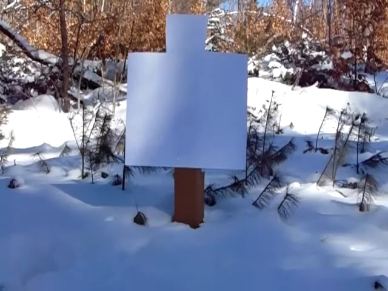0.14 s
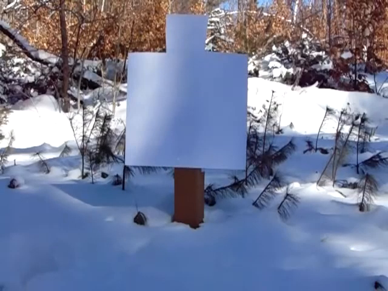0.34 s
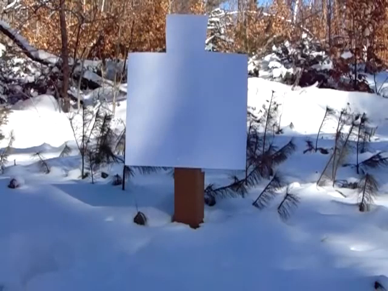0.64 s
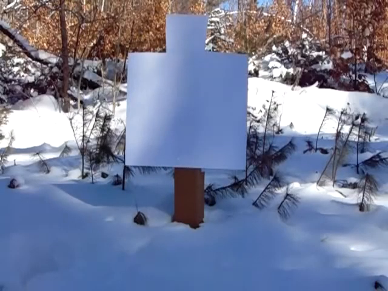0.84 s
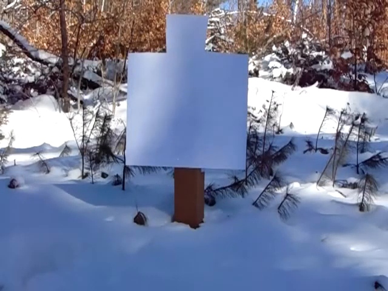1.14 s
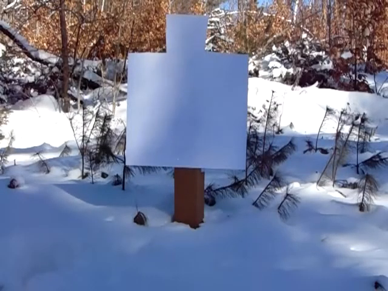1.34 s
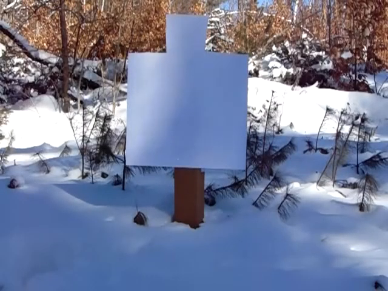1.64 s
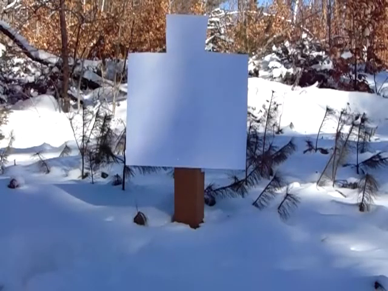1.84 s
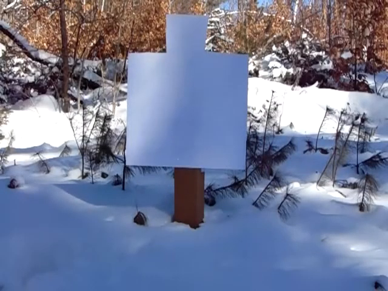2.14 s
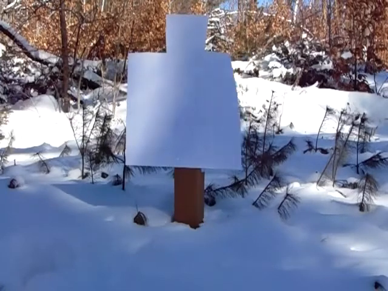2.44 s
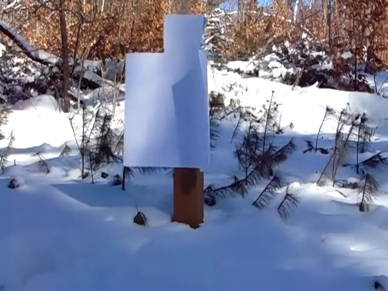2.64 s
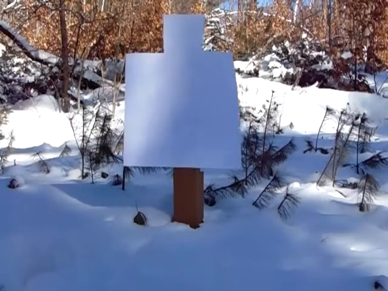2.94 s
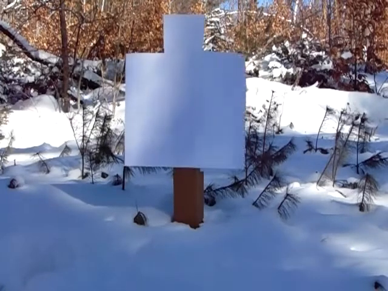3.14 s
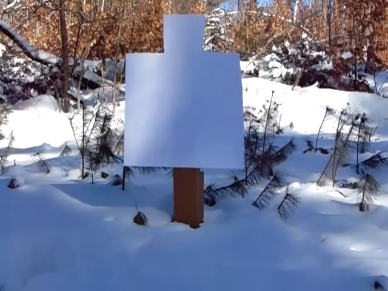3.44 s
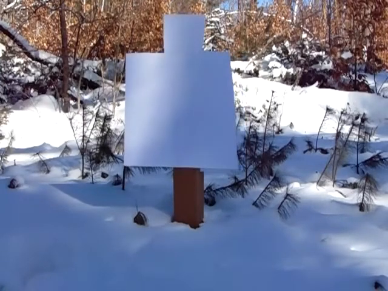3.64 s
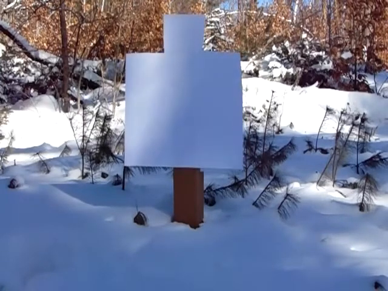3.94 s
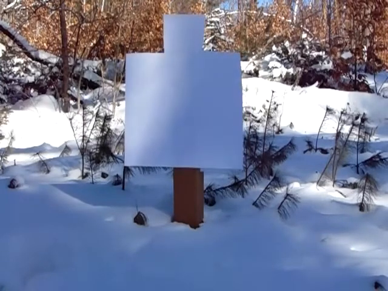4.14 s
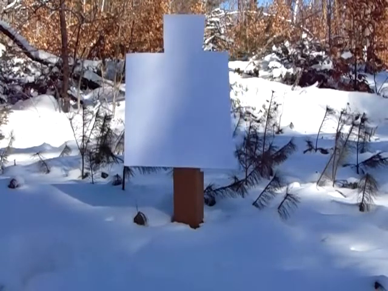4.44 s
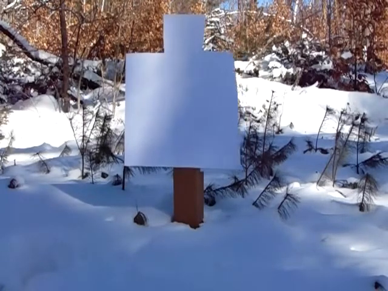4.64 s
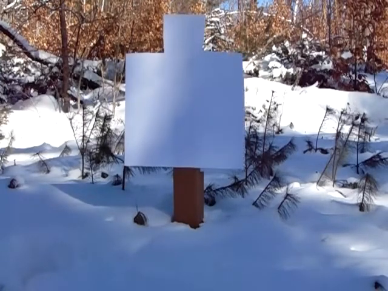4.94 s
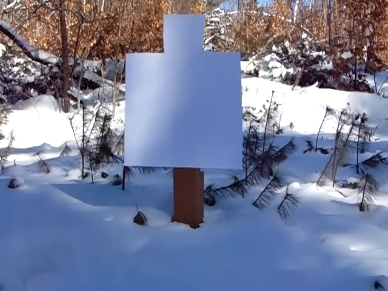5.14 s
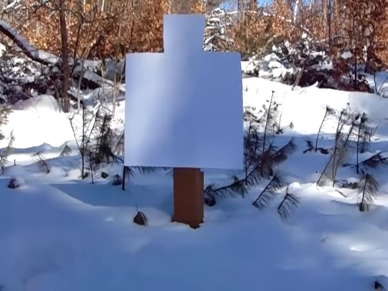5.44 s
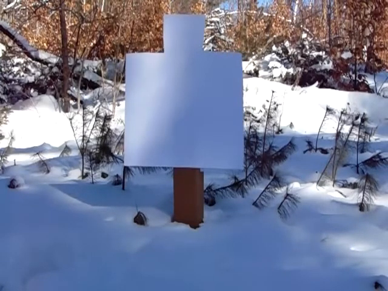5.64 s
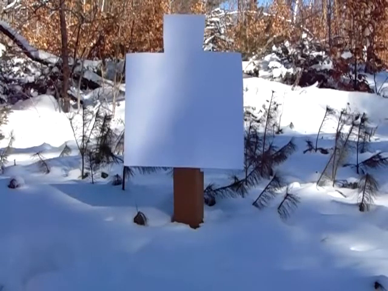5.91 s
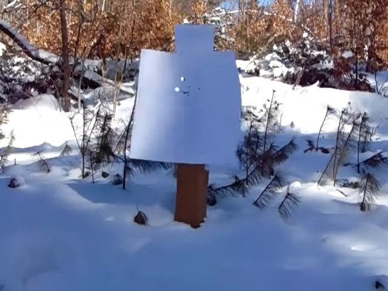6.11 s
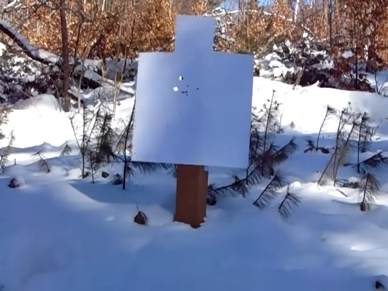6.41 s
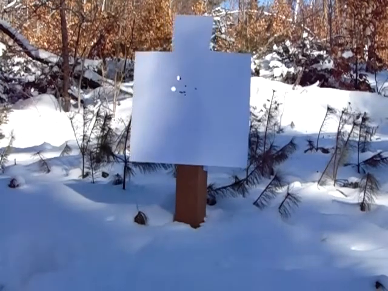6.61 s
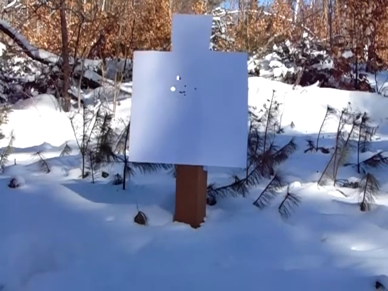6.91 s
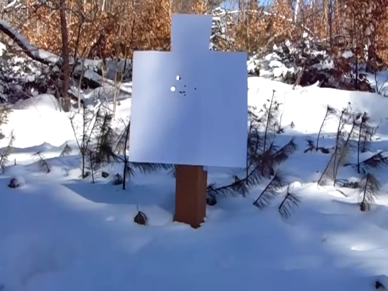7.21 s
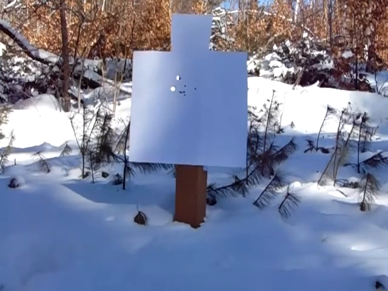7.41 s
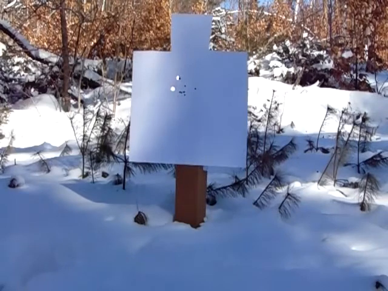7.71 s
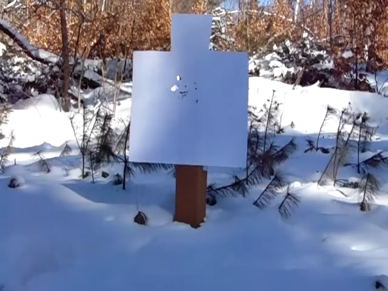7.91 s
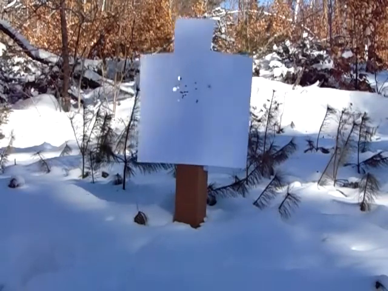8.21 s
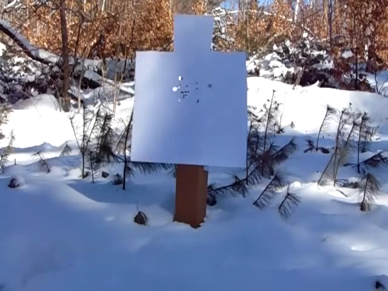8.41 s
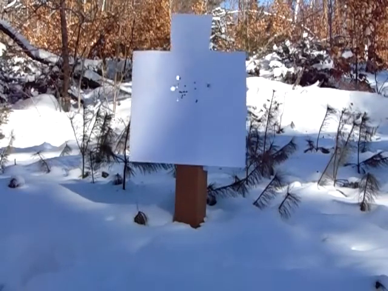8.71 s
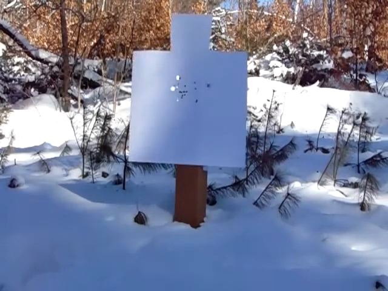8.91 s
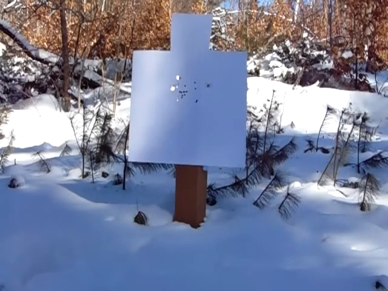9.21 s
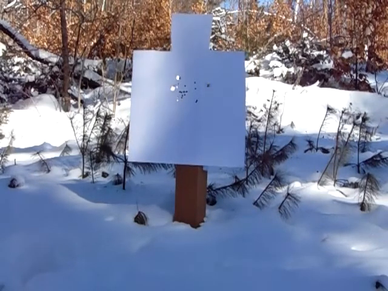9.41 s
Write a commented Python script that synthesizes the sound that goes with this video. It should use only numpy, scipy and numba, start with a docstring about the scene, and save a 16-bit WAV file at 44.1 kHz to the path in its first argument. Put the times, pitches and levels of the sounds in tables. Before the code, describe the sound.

Quiet outdoor air with soft hiss and wind buffeting on a close single-channel microphone. A shotgun slide is racked with crisp metallic clicks, followed by muffled handling, a footstep in snow and two isolated clacks. After a lull, a clipped, violent shot cracks through the trees, then racking, then a second shot, its echo dying under more clatter and faint hiss.

```python
"""A pump shotgun is handled and racked in a snowy clearing, over woods' murmur, hiss and wind buffeting.
Soft knocks and a step in the snow follow, then a few strikes of gun parts before two shots, each followed
by more clatter. Steel strikes are band-split noise rattles; knocks are noisy rings; scrapes are grainy noise.
Each blast is turbulent noise and a suction that pins the microphone amplifier at its lower rail;
near trees scatter a bright noise roar and sharp slaps, then the far tree line returns a dull swell."""
import sys
import numpy as np
from scipy import signal
from scipy.fft import rfft, irfft
from scipy.io import wavfile
from scipy.ndimage import uniform_filter1d
from numba import njit

SR = 44100
rng = np.random.default_rng(int(sys.argv[2]) if len(sys.argv) > 2 else 0)


def store_wav(level_fs):
    """Save 16-bit WAV to argv[1]."""
    pcm = np.round(np.clip(np.atleast_2d(level_fs), -1, 1) * 32767)
    wavfile.write(sys.argv[1], SR, pcm.T.astype(np.int16))


N = 421596

# All source levels are set ahead of the microphone amplifier.
# Beds of woods' murmur and hiss. Each row: time in seconds, murmur level in dB before its flutter, hiss level in dB.
BED_LEVELS = [(0, -47.5, -50), (.152, -54.5, -49.5), (.157, -58.5, -60), (1.3, -57.5, -56.5),
              (2.33, -56.5, -56.5), (3.4, -56.5, -55), (5, -58.5, -54), (6.1, -57.5, -54),
              (6.9, -66.5, -59), (8.0, -62, -58.5), (8.9, -68, -57), (9.25, -65.5, -68.5),
              (9.56, -65, -63.5)]
# Spectrum of the murmur. Each row: frequency in Hz, relative level in dB per Hz.
MURMUR_COLOUR = [(47, -32), (80, 1), (269, -1.5), (313, -2), (669, -5.5), (721, -5.5), (1100, -9),
                 (3000, -15.5), (3900, -32.5), (6600, -120)]
# Spectrum of the hiss. Each row: frequency in Hz, relative level in dB per Hz.
HISS_COLOUR = [(700, -24), (1200, -9), (2000, -8), (3500, 1.5), (6000, -0.5), (9000, -1), (12000, -0.5),
               (14000, -0.5), (16000, 2.5)]
# Spectrum of wind on the microphone. Each row: frequency in Hz, relative level in dB per Hz.
WIND_SPECTRUM = [(10, -31), (20, 6), (30, 6), (50, -1.5), (90, -15), (150, -35), (300, -54)]
# Wind gusts. Each row: peak time in seconds, level in dB before the wind boost,
# length in seconds (twice the fade time constant).
WIND_GUSTS = [(0, -60, .04), (2.15, -45, .08), (2.54, -57, .08), (2.71, -58, 0.046), (2.84, -54, .12),
              (3.41, -58, .1), (3.6, -62, 0.074), (4.41, -66, .1), (4.57, -52, .1), (4.71, -50, .1),
              (4.84, -55, .12), (5.05, -55, 0.086), (5.56, -44, 0.062), (5.74, -56, .1), (5.95, -43.5, .07),
              (6.13, -48.5, .1), (6.31, -40, .04), (6.63, -43.5, .1), (6.766, -44, 0.064),
              (6.9, -42, 0.059), (7.626, -45.5, 0.12), (7.836, -52, 0.056), (7.97, -53.5, .14),
              (8.2, -58, .1), (8.544, -54, 0.049)]
# Soft hollow handling knocks and a step in the snow. Each row: start in seconds, peak in dB, pitch in Hz.
SOFT_KNOCKS = [(0.067, -37, 830), (0.102, -37, 810), (0.135, -37.5, 790), (0.145, -43, 1080),
               (2.059, -49, 336), (2.089, -43, 371), (2.138, -43, 480), (2.152, -46, 760),
               (2.185, -41, 280), (2.207, -43, 600), (2.229, -40.5, 534), (2.247, -44, 830),
               (2.259, -44.5, 300), (2.288, -46.5, 260)]
# The slide scraping and cloth rustling. Each row: start in seconds, length in seconds, level in dB.
SCRAPES = [(.905, 0.098, -50), (.99, 0.086, -50), (1.127, 0.053, -48), (1.938, .105, -53),
           (2.065, .11, -57), (6.74, 0.18, -58), (8.56, 0.06, -49), (8.702, 0.14, -49.5)]
# Spectrum of the scrapes. Each row: frequency in Hz, relative level in dB per Hz.
SCRAPE_COLOUR = [(500, -0.5), (2000, -6.5), (5000, -2), (14000, -4)]
# Gun parts striking. Each row: start in seconds, body peak in dB, thud in dB against the body,
# clack centre in Hz, clack half width in octaves, clack in dB and treble in dB against the body.
STRIKES = [(0.1687, -40, -16, 3000, .4, -5, -2), (0.3476, -44, -21, 3300, .4, 3, 16),
           (0.624, -24, -11, 2180, 0.31, -7, 4), (0.7143, -47, -11, 2000, .6, -10, 4),
           (0.8445, -40.5, -17, 2000, .6, -18, -13), (0.9035, -35.5, -23, 2000, 0.78, -5.5, 2),
           (0.9734, -34, -21, 2000, .7, -6, 2), (0.9841, -23, -15, 2300, 1.2, 5, 15),
           (1.1009, -41, -13, 3350, 0.13, 1.5, 9), (1.145, -32, -1, 3000, 0.51, 1.5, 9),
           (1.1504, -30, -3.5, 2500, .6, -6, 3), (1.1565, -42, -1, 2500, .6, -8, 0),
           (1.205, -40.5, -10, 1900, .5, -3, -6), (1.955, -42.5, -4, 3000, .4, -2, -5),
           (2.0434, -45.5, -10, 2000, .6, -11, 11), (2.1604, -46, 2, 3000, .5, -3, 10),
           (2.5078, -47.5, -9, 2500, 0.66, 5.5, -10), (3.0120, -19, -21.5, 1820, 1.07, 2, 5.5),
           (3.0544, -52, -7, 3000, 0.45, 6, -6), (3.269, -51.5, -15, 2100, 0.44, 12, -9),
           (4.4496, -30, -33, 1820, 0.15, -1.5, 2), (6.6029, -38, -15, 2980, .5, -8, -5),
           (6.6267, -20, -23, 2996, 0.31, -9.5, 4.5), (6.652, -29.5, -14, 2000, .6, -19, 4),
           (6.7565, -47, 1, 1800, .6, -10, 12), (6.786, -41, 4, 3360, .2, 6, 10),
           (6.824, -43, 0, 2000, .6, -2, 10), (6.8755, -36, -4, 1800, 0.27, -2, 9),
           (8.487, -32.5, 6.5, 3000, .4, -7, 7), (8.559, -22, -15, 3020, .4, -8, 6.5),
           (8.5809, -36, -12, 3000, .4, -1, 13), (8.6867, -45, -9, 2500, .6, -2, 7),
           (8.7157, -35.5, -8, 2520, .5, -1, 10), (8.74, -48, 5, 3000, .4, -7, 5),
           (8.754, -45, -21, 2500, 0.66, 7, 12), (8.7772, -33.5, -5, 2200, 0.85, 5, 14.5),
           (8.7856, -30, -13, 2800, 0.62, 1, 10.5)]
# Bands of a strike: thud, body and treble. Each row: low edge in Hz, high edge in Hz.
STRIKE_BANDS = [(350, 1000), (3500, 7000), (7000, 16000)]
# Modes of the steel action. Each row: nominal pitch in Hz, nominal level in dB within the ring,
# time to fade by 60 dB in seconds.
STEEL_MODES = [(1850, 4, .035), (3500, 0, .012), (4500, 0, .012), (7800, 0, .015), (9500, 0, .015),
               (11700, 0, .02)]
# Spectrum of the roar's dull part. Each row: frequency in Hz, relative level in dB per Hz.
DULL_COLOUR = [(60, -30), (130, -18), (250, -2.5), (500, -1), (1000, -1.5), (1800, -6.5), (3000, -13.5),
               (6000, -29.5)]
# Spectrum of the roar's bright part. Each row: frequency in Hz, relative level in dB per Hz.
BRIGHT_COLOUR = [(500, -9.5), (1500, -1), (3000, 0.5), (6000, -1), (9000, -4.5), (12000, -3), (16000, -3.5)]
# Spectrum of the far swell before its moving edge. Each row: frequency in Hz, relative level in dB per Hz.
SWELL_COLOUR = [(60, -37), (150, -25.0), (250, 1.5), (500, 4.0), (1000, 3), (3000, -9), (8000, -11.5)]
# Echoes that stand out as single slaps. Each row: start in seconds, peak in dB, ring pitch in Hz.
ECHO_SLAPS = [(6.231, 5, 950), (6.243, 5, 1150), (6.2565, 1, 1000), (6.2765, 2, 1050), (6.294, -6, 880),
              (6.4258, -14, 1230), (6.514, -23, 750), (8.0676, 8, 1900), (8.1025, 0, 1900),
              (8.1135, 1, 1100), (8.1292, 7, 1050), (8.1608, -9, 820), (8.3093, -17, 1500),
              (8.371, -25, 700), (8.399, -25, 780)]
# Blast fronts and first reflections. Each row: start in seconds, length in seconds, turbulence in dB,
# push above rest in amplifier input units.
PRESSURE_FRONTS = [(6.1612, .0090, 19, -2.5), (6.1808, .0105, 25.5, 6), (6.2030, .0030, 13, -2.5),
                   (6.2072, .0015, 20.5, 0.5), (8.0460, .0075, 18.5, 1.5), (8.0674, .0017, 9, 6),
                   (8.0788, .0004, 1, 1.5), (8.0912, .0016, 10.5, 1)]
# Spectrum of the turbulent gas. Each row: frequency in Hz, relative level in dB per Hz.
GAS_COLOUR = [(100, -8), (500, -1), (1200, -4.5), (3000, -10), (8000, -18.0), (16000, -13.0)]
# The shots. Each row: start in seconds, suction depth in amplifier input units before its decay,
# suction decay in seconds, roar hold in seconds, near roar in dB, its fall in dB per second,
# deep-woods tail in dB, far echo's peak delay in seconds, far echo in dB before its flutter.
GUN_SHOTS = [(6.1619, 8.6, 0.058, 0.075, -3.5, -600, -27.5, 1.035, -43.5),
             (8.045, 7.53, 0.099, 0.073, -10.5, -700, -29, 0.85, -49)]

BREEZE_DB, WIND_BOOST_DB = -6, 6.5  # steady rumble against the murmur; boost of all wind
KNOCK_T60_S = .055  # fade of the noise that drives a knock
SCRAPE_FADE_S = .015
GRAINS_PER_S, GRAIN_S, GRAIN_SPREAD_DB = 200, .001, 3.0
RATTLE_S, RING_DB = .00068, -48.5  # rattle time constant, drive of the steel ring
LOOSE_DB, LOOSE_FADE_S = -21, .006
WALL_S, WALL_DB = .0214, -22.5  # a surface a few metres off returns each strike once
TREES_DB, TREES_T60_S = -43.5, .49  # scattered answer, level before its low-pass and fade
ROAR_ARRIVES_S, EARLY_DB = .045, -4  # the nearest trunks answer weaker until the thicket joins in
NEAR_DULL_SHARE = 1  # the near dull roar falls at this share of the bright rate
DULL_TAIL_DB_S, BRIGHT_TAIL_DB_S = -34, -45
MIDDLE_DB, MIDDLE_FALL_DB_S = 9.5, -170  # trees further back, level against the tail
BRIGHT_DB, BRIGHT_TAIL_DB, BRIGHT_TAIL_ENDS_S = 1.5, -2, .82  # treble dies out beyond the last near trees
FAR_RISE_S, FAR_FALL_S = .3, .67  # distance from the peak at which the swell is 5.1 dB down
FAR_EDGE_HZ, FAR_DULLS_OCT_S = 1200, 1  # upper edge at the peak, sinking as air absorbs the treble
SLAP_CYCLES, SLAP_CRACK_S = 12., .0009  # ring cycles to fade by 60 dB, crack time constant
SUCTION_RISE_S = .008
RAIL, LEAK = 3.57, .05  # amplifier limit in input units, share of the excess that still passes
COUPLING_HZ, RUMBLE_CUT_HZ, TOP_HZ = 121, 6, 14350
CONVERTER_LIMIT = .86


def undb(db):
    """Turn dB into an amplitude factor."""
    return 10 ** (np.asarray(db) / 20)


def noise(colour):
    """Shape white noise with a (Hz, dB) spectrum and scale it to rms 1."""
    hz, db = np.transpose(colour)
    bins = np.arange(1, N // 2 + 2) * SR / N
    shape = undb(np.interp(np.log(bins), np.log(hz), db))
    x = irfft(rfft(rng.standard_normal(N)) * shape, N)
    return x / np.std(x)


def gains(table):
    """Draw gain curves through a (seconds, dB, ..) table."""
    s, *columns = np.transpose(table)
    return [undb(np.interp(np.arange(N) / SR, s, c)) for c in columns]


def walk(rate):
    """Wander randomly with spread near 1: levels held 1 / rate seconds, smoothed twice."""
    k = int(SR / rate)
    steps = np.repeat(rng.standard_normal(N // k + 1), k)
    return 1.4 * uniform_filter1d(uniform_filter1d(steps, k), k)[:N]


def add(out, s, x):
    """Mix a sound in at s seconds, cut at the end of the scene."""
    i = int(s * SR)
    out[i:i + len(x)] += x[:N - i]


def ring(x, hz, t60):
    """Let x excite one decaying mode."""
    pole = np.exp(2j * np.pi * hz / SR - np.log(1000) / (max(t60, .002) * SR))
    return signal.lfilter([1], [1, -pole], x).imag


@njit
def lowpass(x, hz):
    """Darken x through two one-pole stages with a moving edge."""
    y, a, b = np.empty(len(x)), 0., 0.
    for i in range(len(x)):
        g = 1 - np.exp(-2 * np.pi * hz[i] / SR)
        a += g * (x[i] - a)
        b += g * (a - b)
        y[i] = b
    return y


def background():
    """Lay fluttering murmur and smooth hiss under low noise that swells with wind gusts on the microphone."""
    murmur, hiss = gains(BED_LEVELS)
    t = np.arange(N) / SR
    gusts = sum(undb(db) * np.exp(-np.abs(t - s) / (length / 2)) for s, db, length in WIND_GUSTS)
    breeze = murmur * undb(BREEZE_DB + 3.0 * walk(8))
    wind = (gusts + breeze) * undb(WIND_BOOST_DB + 2 * walk(33)) * noise(WIND_SPECTRUM)
    return murmur * undb(walk(26)) * noise(MURMUR_COLOUR) + hiss * noise(HISS_COLOUR) + wind


def knocks():
    """Excite one pitch and a weaker overtone with a short burst of noise per knock."""
    out, t = np.zeros(N), np.arange(5000) / SR
    for s, db, hz in SOFT_KNOCKS:
        blow = rng.standard_normal(len(t)) * undb(-60 * t / KNOCK_T60_S)
        x = ring(blow, hz, 0.014) + undb(-7) * ring(blow, 2.05 * hz, 0.012)
        add(out, s, undb(db) * x / np.abs(x).max())
    return out


def scraping():
    """Modulate coloured noise with random stick-slip grains over a steady rub."""
    t = np.arange(N) / SR
    rubbing = np.zeros(N)
    for s, length, db in SCRAPES:
        fade = np.clip(np.minimum(t - s, s + length - t) / SCRAPE_FADE_S + .5, 0, 1) ** 2
        rubbing += undb(db) * fade
    when, size = rng.random((2, N))
    slips = (when < GRAINS_PER_S / SR) * undb(-GRAIN_SPREAD_DB * np.log(1 - size))
    grains = 0.51 + signal.lfilter([1], [1, -np.exp(-1 / (GRAIN_S * SR))], slips)
    return rubbing * grains / np.sqrt(np.mean(grains ** 2)) * noise(SCRAPE_COLOUR)


def surroundings():
    """Build the answer to each strike: direct sound, one wall return and fading scatter from the trees."""
    t = np.arange(SR // 4) / SR
    scatter = signal.lfilter(*signal.butter(1, 3500, fs=SR), rng.standard_normal(len(t)))
    reply = undb(TREES_DB) * scatter * undb(-60 * t / TREES_T60_S) * (t > WALL_S)
    reply[int(WALL_S * SR)] = undb(WALL_DB)
    reply[0] = 1
    return reply


def action():
    """Strike steel as a short broad rattle with a faint modal ring, balanced in four bands."""
    out, t = np.zeros(N), np.arange(4000) / SR
    thud, body, treble = STRIKE_BANDS
    # loose parts shiver on after the blow
    loose = undb(LOOSE_DB) * np.minimum(t / (2 * RATTLE_S), 1) * np.exp(-t / LOOSE_FADE_S)
    rattle = (t / RATTLE_S) ** 2 * np.exp(-t / RATTLE_S)
    for s, db, thud_db, clack_hz, clack_oct, clack_db, treble_db in STRIKES:
        hit = rng.standard_normal(len(t)) * (rattle + loose)
        hit[int(3 * RATTLE_S * SR)] += 2.4  # the hardest metal-to-metal contact is a sharp spike
        steel = np.zeros(len(t))
        for hz, mode_db, t60 in STEEL_MODES:
            level_spread, pitch_spread = rng.standard_normal(2)
            steel += undb(mode_db + 2 * level_spread) * ring(hit, hz * (1 + 0.05 * pitch_spread), t60)
        hit += undb(RING_DB) * steel
        clack = clack_hz * 2 ** (max(clack_oct, .05) * np.array([-1, 1]))
        for edges, band_db in zip((thud, clack, body, treble), (thud_db, clack_db, 0, treble_db)):
            hit = -hit  # neighbouring bands meet in phase
            part = signal.sosfilt(signal.butter(2, edges, "band", fs=SR, output="sos"), hit)
            add(out, s, undb(db + band_db) * part / np.abs(part).max())
    return signal.fftconvolve(out, surroundings())[:N]


def far_swell():
    """Return each shot from the far tree line as a late noise swell whose treble sinks."""
    level, edge_hz = np.zeros(N), np.full(N, 1. * FAR_EDGE_HZ)
    t = np.arange(2 * SR) / SR
    for s, *_, far_s, far_db in GUN_SHOTS:
        width = np.where(t < far_s, FAR_RISE_S, FAR_FALL_S)
        add(level, s, undb(far_db - 5.1 * ((t - far_s) / width) ** 2))
        i = int(s * SR)
        edge_hz[i:i + len(t)] = (FAR_EDGE_HZ * 2 ** (-FAR_DULLS_OCT_S * (t - far_s)))[:N - i]
    swell = lowpass(noise(SWELL_COLOUR), edge_hz)
    return level * undb(walk(60)) * swell / np.std(swell)


def roar():
    """Scatter each shot off the trunks as dull and bright noise with near, middle and deep decays."""
    dull, bright = np.zeros(N), np.zeros(N)
    t = np.arange(2 * SR) / SR
    for s, _, _, hold, near_db, fall_db, tail_db, *_ in GUN_SHOTS:
        late = np.maximum(t - hold, 0)
        near_db = near_db + EARLY_DB * (t < ROAR_ARRIVES_S)
        middle = undb(tail_db + MIDDLE_DB + MIDDLE_FALL_DB_S * late)
        dull_near = undb(near_db + NEAR_DULL_SHARE * fall_db * late)
        dull_tail = undb(tail_db + DULL_TAIL_DB_S * late)
        add(dull, s, middle + dull_near + dull_tail)
        gone_db = -100 * np.maximum(t - BRIGHT_TAIL_ENDS_S, 0)
        bright_near = undb(near_db + BRIGHT_DB + fall_db * late)
        bright_tail = undb(tail_db + BRIGHT_TAIL_DB + BRIGHT_TAIL_DB_S * late + gone_db)
        add(bright, s, middle + bright_near + bright_tail)
    dull_roar = undb(2 * walk(150)) * dull * noise(DULL_COLOUR)
    return dull_roar + undb(1.5 * walk(200)) * bright * noise(BRIGHT_COLOUR)


def slaps():
    """Make each distinct echo a short broad crack that excites one quickly fading ring."""
    out, t = np.zeros(N), np.arange(800) / SR
    for s, db, hz in ECHO_SLAPS:
        crack = rng.standard_normal(len(t)) * np.exp(-t / SLAP_CRACK_S)
        crack[0] = 4.0  # sharp leading edge
        slap = ring(crack, hz, SLAP_CYCLES / hz) + crack
        add(out, s, undb(db) * slap / np.abs(slap).max())
    return out


def blasts():
    """Push turbulent pressure fronts at the microphone, each muzzle blast with a long suction."""
    out, gas = np.zeros(N), noise(GAS_COLOUR)
    for s, length, db, push in PRESSURE_FRONTS:
        i, n = int(s * SR), max(int(length * SR), 4)
        edge = np.minimum(1, 4.1 * np.sin(np.pi * np.arange(n) / n))
        add(out, s, edge * (push + undb(db) * gas[i:i + n]))
    t = np.arange(SR) / SR
    for s, depth, decay, *_ in GUN_SHOTS:
        add(out, s, -depth * np.minimum(t / SUCTION_RISE_S, 1) ** 2 * np.exp(-t / decay))
    return out


def scene():
    """Mix the blasts, the woods' answers, the handling and the clearing to one channel."""
    shots = blasts() + roar() + far_swell() + slaps()
    handling = action() + scraping() + knocks()
    return (shots + handling + background())[None]


def record(dry):
    """Saturate the first stage at its rails, drift back through coupling capacitors, clip at the converter."""
    held = np.clip(dry, -RAIL, RAIL)
    stage = held + LEAK * (dry - held)
    for hz in (COUPLING_HZ, RUMBLE_CUT_HZ):
        stage = signal.lfilter(*signal.butter(1, hz, "high", fs=SR), stage)
    drive = np.abs(stage) / CONVERTER_LIMIT
    clipped = CONVERTER_LIMIT * np.tanh(drive ** 3) ** (1 / 3) * np.sign(stage)
    top_cut = signal.ellip(12, .2, 80, TOP_HZ, fs=SR, output="sos")
    return np.clip(signal.sosfilt(top_cut, clipped), -1, 1)


dry = scene()
out = record(dry)
store_wav(out)
```